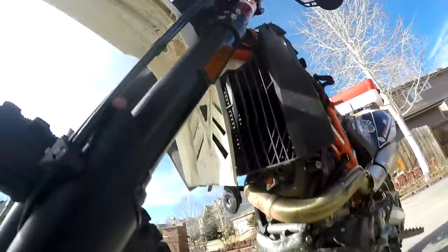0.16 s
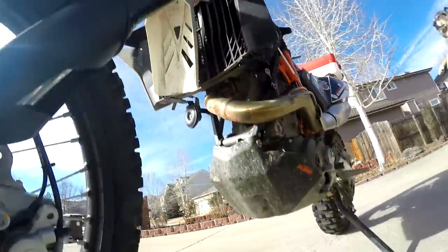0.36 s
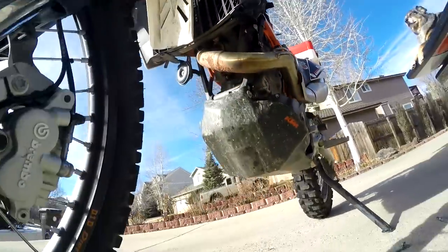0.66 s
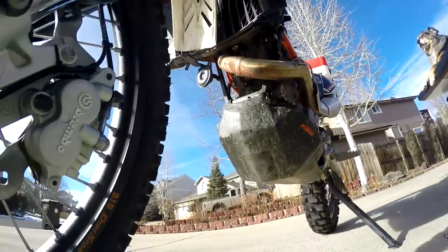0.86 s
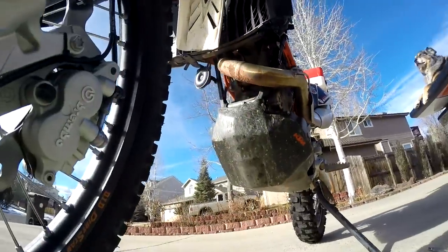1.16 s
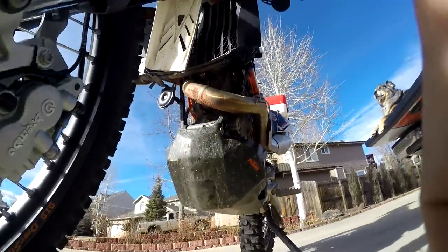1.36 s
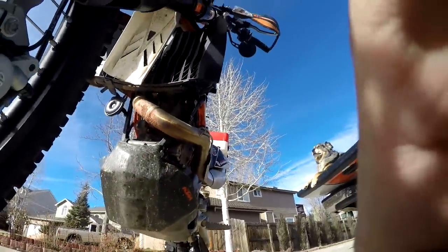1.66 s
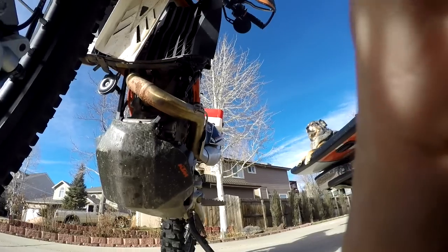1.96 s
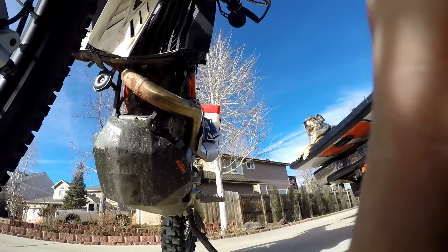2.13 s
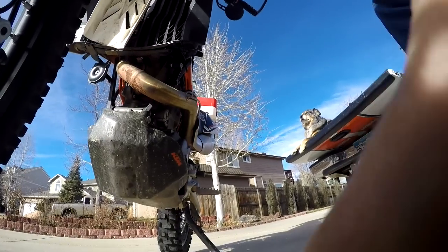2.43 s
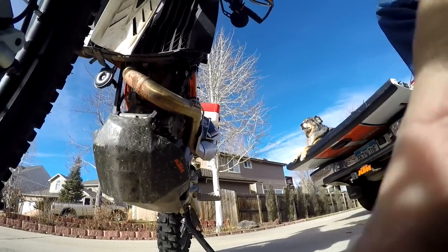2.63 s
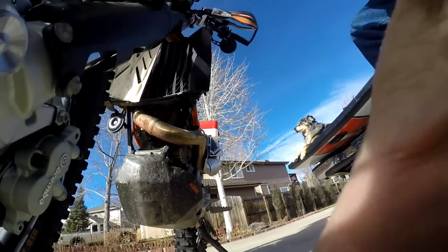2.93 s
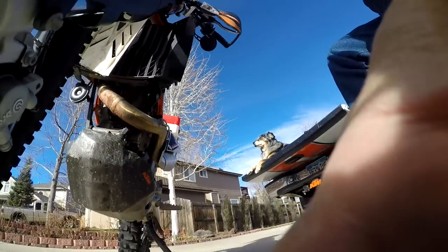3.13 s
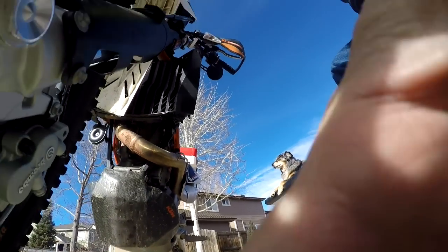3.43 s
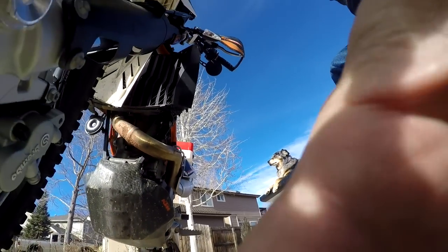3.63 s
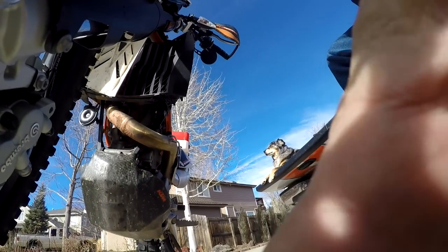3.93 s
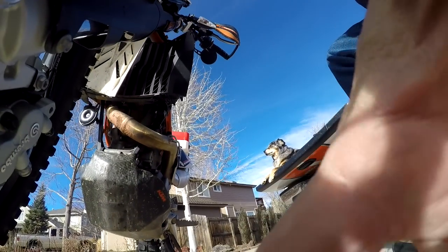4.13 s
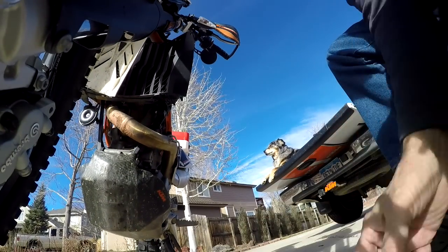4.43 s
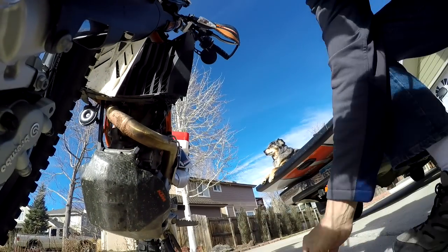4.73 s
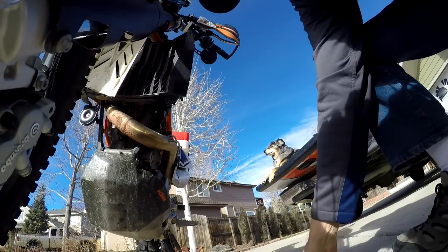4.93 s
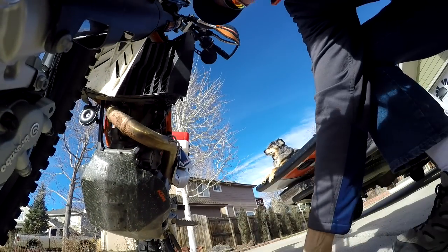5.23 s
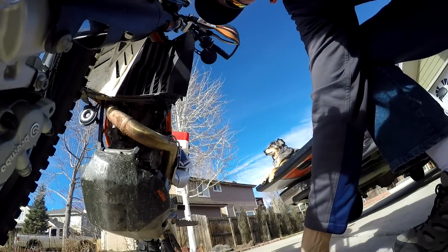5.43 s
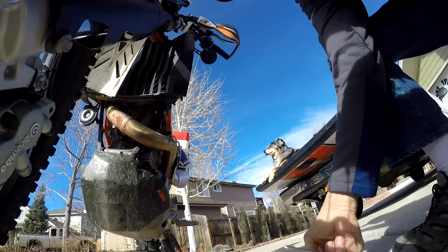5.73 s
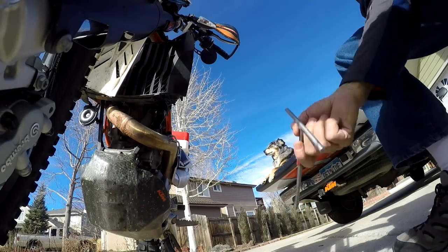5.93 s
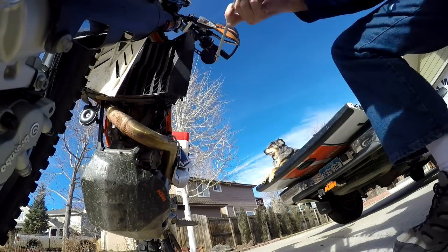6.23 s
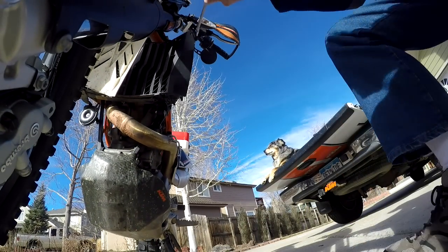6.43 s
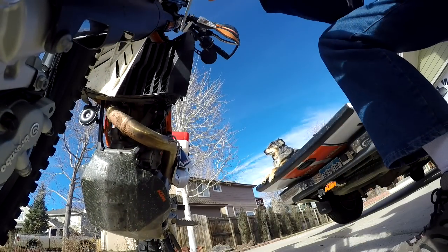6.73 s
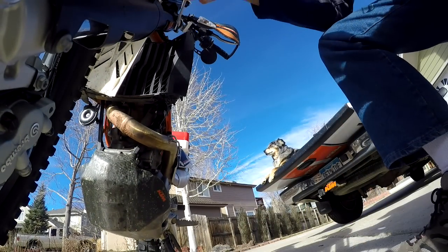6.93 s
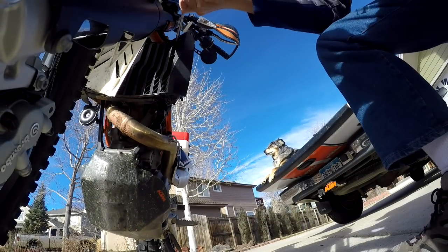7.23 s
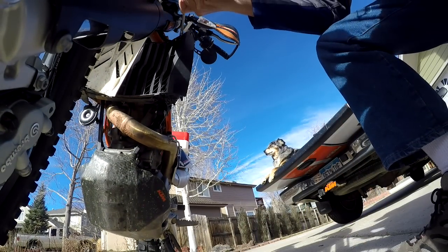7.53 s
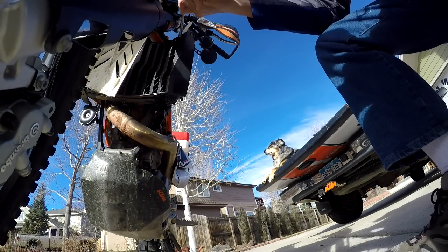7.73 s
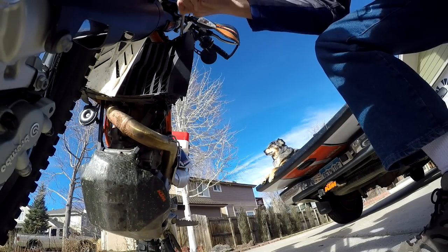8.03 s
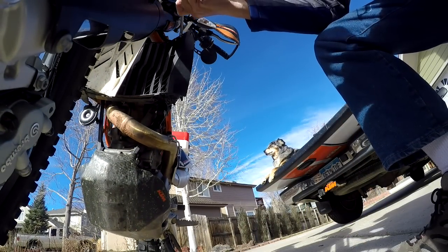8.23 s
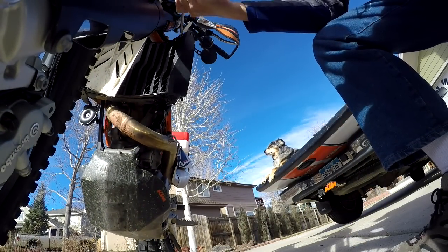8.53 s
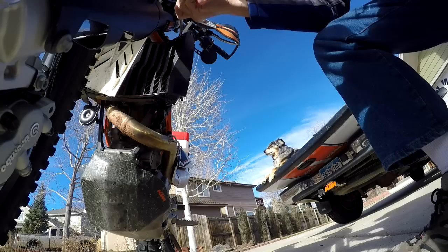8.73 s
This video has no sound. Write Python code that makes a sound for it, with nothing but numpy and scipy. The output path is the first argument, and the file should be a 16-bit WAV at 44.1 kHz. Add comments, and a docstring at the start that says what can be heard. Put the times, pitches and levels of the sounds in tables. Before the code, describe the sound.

Very close, boxy handling noise opens: skin rubbing, sharp plastic cracks, hollow bumps and gritty scrapes in clusters, some hard enough to crunch the microphone. After four seconds the handling stops, leaving faint street rumble and soft wind. A much quieter bright metal jingle skips over concrete, followed by a soft deep thump, one clearer click and scattered tiny tool clicks beside the parked motorbike.

```python
"""On a concrete driveway beside a parked motorbike, a small camera's own microphone hears itself being handled.
Fingers rub its shell, and its case knocks, ticks and scrapes as it is shuffled into place: noise for
friction, and sharp blows with a dying chatter through body resonances for the hits.
Then a steel wrench jingles, as a bank of ringing modes, while it is dragged off the concrete.
It clicks faintly on a bolt, once before the drag and mostly after. Noise makes the wind and outdoor rumble."""
import sys
import numpy as np
from scipy import signal
from scipy.fft import rfft, irfft, next_fast_len
from scipy.io import wavfile
from scipy.ndimage import uniform_filter1d, map_coordinates

SR = 44100
rng = np.random.default_rng(int(sys.argv[2]) if len(sys.argv) > 2 else 0)


def int16_out(signal):
    """Quantize to a 16-bit WAV file."""
    q = np.round(np.clip(np.atleast_2d(signal).T, -1, 1) * 32767)
    wavfile.write(sys.argv[1], SR, q.astype(np.int16))


N = 391166  # length in samples


def amp(db):
    """Decibels to gain."""
    return 10 ** (np.asarray(db) / 20)


def unit(x):
    """Scale to rms 1."""
    return x / np.sqrt(np.mean(x ** 2) + 1e-20)


def crest(x):
    """Scale a hit so that its loudest two milliseconds have rms 1."""
    loudest_power = uniform_filter1d(x ** 2, size=88, mode="constant").max()
    return x / np.sqrt(loudest_power + 1e-20)


def colour(points, hz):
    """Gain at each frequency, from (frequency_hz, level_db) points on a log axis."""
    point_hz, point_db = np.transpose(points)
    return amp(np.interp(np.log(hz + 1), np.log(point_hz), point_db))


def level(rows):
    """Gain per sample along (time_s, level_db) points."""
    return amp(np.interp(np.arange(N) / SR, *np.transpose(rows)))


def wobble(rate):
    """A smooth random curve with rate knots a second."""
    knots = rng.standard_normal(int(N * rate / SR) + 4)
    return map_coordinates(knots, [np.arange(N) * rate / SR])


def filtered(x, response):
    """Multiply the spectrum of x by a complex response of frequency."""
    size = next_fast_len(len(x) + 8192)  # padded so that tails do not wrap round
    spectrum = rfft(x, size) * response(np.fft.rfftfreq(size, 1 / SR))
    return irfft(spectrum, size)[:len(x)]


def noise(points):
    """Coloured noise of rms 1."""
    return unit(filtered(rng.standard_normal(N), lambda hz: colour(points, hz)))


def causal(x, points, size=2048):
    """Colour a hit with a minimum-phase filter, so nothing smears ahead of its onset."""
    cepstrum = irfft(np.log(colour(points, np.fft.rfftfreq(size, 1 / SR))))
    # fold the cepstrum onto positive time
    cepstrum[1:size // 2] *= 2
    cepstrum[size // 2 + 1:] = 0
    impulse = irfft(np.exp(rfft(cepstrum)))
    return signal.fftconvolve(x, impulse)[:len(x)]


def resonate(x, peaks):
    """Pass x through a body's resonances, rows of (pitch_hz, width_hz, level_db)."""
    def response(f):
        total = 0
        for k, (centre, width, db) in enumerate(peaks):
            band = 1j * f * width / (centre * centre - f * f + 1j * f * width)
            total = total + (-1) ** k * amp(db) * band  # neighbours have opposite signs
        return total
    return filtered(x, response)


def ring(modes, scatter_db, size=SR // 2):
    """Free ringing of (pitch_hz, level_db, t60_s) modes, with new strengths and phases for every blow."""
    t = np.arange(size) / SR
    total = np.zeros(size)
    for hz, db, t60 in modes:
        decay = amp(db + scatter_db * rng.normal() - 60 * t / t60)
        total += decay * np.sin(2 * np.pi * (hz * t + rng.random()))
    return total


def contact(t60, grit, size=SR // 8):
    """Contact force: one sharp blow, then a dying chatter of micro-impacts."""
    t = np.arange(size) / SR
    chatter = rng.standard_normal(size) * rng.exponential(size=size) * amp(-60 * t / t60)
    return (t == 0) + grit * chatter / np.linalg.norm(chatter)


RISE_SHARE = 0.41  # part of a stroke spent speeding up


def strokes(rows):
    """Gain of sliding strokes: each speeds up to its peak and slows to rest."""
    t = np.arange(N) / SR
    power = np.zeros(N)
    for peak_s, length_s, db in rows:
        start_s = peak_s - RISE_SHARE * length_s
        end_s = peak_s + (1 - RISE_SHARE) * length_s
        speed = np.sin(np.pi / 2 * np.interp(t, [start_s, peak_s, end_s], [0, 1, 0]))
        power += (amp(db) * speed ** 2) ** 2
    return np.sqrt(power)


def add(track, s, hit):
    """Mix a hit into the track at s seconds."""
    part = track[max(round(s * SR), 0):][:len(hit)]
    part += hit[:len(part)]


# Levels are relative: the functions below trim them into the mix.
# hand pressure rumbling through the case: time_s, level_db
HANDLING = [(0, -44.5), (1.6, -45.5), (2.1, -37), (2.38, -43), (2.47, -31), (3.1, -33.5), (3.4, -70)]
# wind rumbling at the microphone port: time_s, level_db
WIND = [(3.5, -58.5), (4.6, -46), (5.9, -40.5), (6.35, -47.5), (7.5, -58), (7.95, -55.5), (8.1, -39),
        (8.4, -54.5), (8.87, -43)]
# hiss of the outdoor air: time_s, level_db
AIR = [(4.25, -63.5), (5.7, -58), (6.4, -59.5), (7.4, -62.5), (8.5, -62.5), (8.87, -59.5)]
# colours of hand and wind rumble, far street and air hiss: frequency_hz, level_db
BUFFET = [(12, -11.5), (30, 7.5), (48, 2.5), (80, -8.5), (150, -14.5), (300, -27.5), (600, -66.5)]
STREET = [(41, -34), (70, -3), (219, -12), (249, -17.5), (310, -9.5), (461, -14.5), (511, -19.5),
          (887, -32.5), (1160, -37), (1500, -40.5), (1950, -76), (3300, -120)]
HISS = [(600, -22.5), (1000, -2), (1400, -7.5), (2000, -6), (5100, -10), (8500, -16.5), (12800, -17.5),
        (15100, -17), (15600, -44)]


def outdoors():
    """Lumpy low noise is hand and wind at the port; steadier noises are the far street and a thin hiss."""
    lumps = amp(2.5 * wobble(8))
    rumble = amp(5.5) * np.hypot(level(HANDLING), level(WIND)) * lumps * noise(BUFFET)
    street = amp(-49.5 + 0.46 * wobble(0.76)) * noise(STREET)
    hiss = amp(-3.0) * level(AIR) * noise(HISS)
    return rumble + street + hiss


# skin sliding on the shell: peak_s, length_s, level_db
RUBS = [(0.005, 0.032, -30), (0.1, 0.24, -28.5), (0.33, .14, -34.5), (0.45, 0.18, -37.5),
        (0.88, 0.25, -39.5), (1.19, 0.026, -32), (1.265, 0.16, -33), (1.52, 0.13, -39.5),
        (1.985, 0.038, -30), (2.115, 0.16, -28.5), (2.235, 0.096, -30.5), (2.49, 0.11, -32),
        (2.615, 0.25, -19.5), (2.9, 0.31, -35.5), (3.72, 0.15, -34), (3.95, .24, -41.5),
        (4.175, 0.042, -53)]
# the case scraping over the concrete: peak_s, length_s, level_db
SCRAPES = [(0.63, 0.082, -32), (0.76, 0.069, -37.5), (1.38, .11, -23.5), (2.32, 0.032, -38),
           (2.48, 0.19, -26), (2.58, 0.23, -27.5), (3.14, 0.16, -41), (3.495, 0.15, -31.5),
           (3.77, 0.096, -26)]
# the holding hand creeping on the shell between strokes: time_s, level_db
CREEP = [(0, -41.5), (.6, -48.5), (.79, -47.5), (.81, -82), (.85, -48), (1.08, -49), (1.12, -51),
         (1.18, -47.5), (1.45, -42.5), (1.62, -50.5), (1.95, -44.5), (2.85, -45.5), (3.25, -51),
         (3.39, -66.5), (3.63, -71), (3.72, -53.5), (4.0, -47.5), (4.13, -76)]
# resonances of the hollow case under friction: pitch_hz, width_hz, level_db
HOLLOW = [(162, 9.4, 1.2), (410, 52, 0.28)]
# resonances of the plastic shell, also used by ticks and knocks: pitch_hz, width_hz, level_db
SHELL = [(1391, 400, -10.5), (1775, 170, -3.5), (2380, 160, -2), (2945, 340, 10), (3850, 250, 5.5),
         (4970, 170, -3), (5600, 400, -6)]
# colours of sliding skin, rasping concrete and treble fizz: frequency_hz, level_db
SKIN = [(200, -24.5), (700, -9.5), (1500, -6.5), (2200, -2), (2800, -6), (3500, -10.5), (4200, -10),
        (5300, -6), (6200, -16), (7000, -15.5), (9000, -25), (16000, -56)]
RASP = [(300, -10), (900, -4), (1600, -1), (2100, -2), (3000, -33.5)]
FIZZ = [(5000, -31), (7500, -4), (10000, 0.5), (13000, -1), (15200, 0), (15700, -27)]
# colours of a soft push (also knocks and bumps) and a hard snap (also ticks): frequency_hz, level_db
SOFT = [(700, 9.5), (1500, -7), (4000, -29.5), (10000, -56)]
SNAP = [(200, -5), (1000, -5.5), (1500, -2.5), (2600, 4), (4200, -7), (5600, -6.5), (7000, -21),
        (10000, -31), (15000, -39)]
RASP_DB, SCRAPE_RUB_DB = -13, -7.5  # rasp within a rub, rub within a scrape
FIZZ_DB, FIZZ_GROWS = -10.5, 1.31  # the fizz grows faster than the rub


def rubbing():
    """Skin sticks and slips on the plastic, the case rasps on the concrete; friction stirs the hollow case."""
    skin = np.hypot(level(CREEP), strokes(RUBS))
    ground = strokes(SCRAPES)
    rub = np.hypot(skin, amp(SCRAPE_RUB_DB) * ground)
    rasp = np.hypot(ground, amp(RASP_DB) * skin)
    fizz = amp(FIZZ_DB) * rub ** FIZZ_GROWS
    grip = amp(1.2 * wobble(60) + 2.2 * wobble(700))
    hollow = unit(resonate(causal(rng.standard_normal(N), SOFT), HOLLOW))
    # as the finger travels, different resonances of the shell speak up
    slip = noise(SKIN)
    voiced = np.zeros(N)
    for hz, width, db in SHELL:
        voiced += amp(3.5 * wobble(14)) * unit(resonate(slip, [(hz, width, 0)])) * amp(db)
    # dust caught under the skin, about 45 catches a second
    dust = (rng.random(N) < 45 / SR) * rng.standard_normal(N)
    catches = unit(causal(dust, SNAP))
    shell = amp(-3) * noise(SKIN) + amp(-2) * unit(voiced)
    shell += amp(-9.5) * hollow + amp(-10.5) * catches
    return grip * (rub * shell + amp(-5) * rasp * noise(RASP) + fizz * noise(FIZZ))


# grit and fingernails snapping on the shell: start_s, level_db
TICKS = [(0.3294, -10), (0.4521, -2.5), (0.4711, -4), (0.7613, -24), (1.342, -16.5), (1.425, -17.5),
         (1.446, -19.5), (1.6006, -13), (1.6768, -16), (1.7965, -15), (1.8725, -9.5), (2.3088, -19),
         (2.753, -10), (2.9916, -4.5), (3.1749, -15), (3.1864, -17.5), (3.2364, -14.5), (3.2524, -8),
         (3.3052, -24), (3.4787, -12), (3.5405, -13), (3.5646, -7), (3.6695, -16), (3.6925, -18),
         (3.7093, -5), (3.7271, -12.5)]
# the case bumping the ground, also used by knocks: start_s, thud_hz, thud_db, hollow_db, crack_db
KNOCKS = [(0.8201, 275, 9, -0.5, -1), (0.965, 114, -26, -21, -18), (1, 120, -27.5, -27.5, -28),
          (1.087, 180, -23.5, -25.5, -23.5), (1.196, 150, -46, -29, -52), (1.311, 171, -15.5, -12.5, -3),
          (1.359, 220, -27.5, -11, -7.5), (1.375, 297, -24, -12, -17), (1.389, 235, -33, -8.5, -12),
          (1.405, 168, -29.5, -20, -26.5), (1.696, 180, -42.5, -14, -16.5), (1.716, 134, -18, -14.5, -19.5),
          (1.762, 140, -19.5, -14, -20.5), (1.8313, 153, -17.5, -8, -2.5), (1.847, 162, -14, -11, -16),
          (1.903, 288, -28.5, -25, -33.5), (2.102, 110, -36, -21, -36), (2.409, 180, -7.5, -9.5, -18),
          (2.4189, 170, -6.5, -14.5, -3), (2.441, 111, -6.5, -13.5, -12), (2.533, 218, -15.5, -9, -16.5),
          (2.594, 168, -12.5, -11.5, -16), (2.653, 149, -24.5, -7, -20), (2.785, 256, -15, -9.5, -4.5),
          (2.801, 234, -7.5, -15.5, -24), (2.927, 164, -8, -6, -5), (3.086, 250, -11.5, -5.5, -0.5),
          (3.209, 236, -11.5, -4.5, -8.5), (3.2456, 223, -18.5, -18, -14), (3.461, 137, -25, -22.5, -11),
          (3.515, 224, -29, -17.5, -23.5), (3.821, 281, -36, -21.5, -30)]
# ringing modes of the mount, also used by knocks: pitch_hz, level_db, t60_s
MOUNT = [(1922, -2, .19), (2374, 0, .17), (2740, -1, .12), (3230, -2, .15), (3655, -6, .14),
         (5093, -4, .12)]
RATTLE_S, RATTLE_DB = .04, -14  # loose parts tick within this time of a knock, about this far from its crack


def ticks(count=2):
    """Tiny hard contacts snap on the shell and leave the mount faintly ringing; loose parts rattle after knocks."""
    out = np.zeros(N)
    rattle = []
    for s, *_, crack_db in KNOCKS:
        for delay in rng.random(count):
            rattle.append((s + RATTLE_S * delay, crack_db + RATTLE_DB + 3 * rng.normal()))
    for s, db in TICKS + rattle:
        snap = causal(contact(t60=.012, grit=1.5), SNAP)
        shell = resonate(snap, SHELL)
        add(out, s, amp(db - 9) * crest(crest(snap) + amp(-2.5) * crest(shell)))
    for s, db in TICKS:
        add(out, s, amp(db - 39) * crest(ring(MOUNT, scatter_db=2)))
    return out


# the grip shifting the lowest resonance of the case: time_s, pitch_hz
GRIP = [(0.82, 325), (0.96, 419), (1.19, 400), (1.38, 451), (1.7, 397), (2.45, 433.4), (3.3, 385)]
# higher resonances of the hollow case: pitch_hz, width_hz, level_db
CASE = [(580, 127, -5.5), (658, 47, -9), (819.6, 110, -3.5), (1260, 180, -1.5)]
# colours of a crack on the shell and of a sharp edge (also the bolt's sparkle): frequency_hz, level_db
CRACK = [(300, -23), (900, -1.5), (1600, 9.5), (2700, 4), (3300, -3), (3900, -4), (5700, 3.5),
         (7000, -24.5), (10000, -40), (15000, -37.5)]
EDGE = [(4000, -32), (7500, 4), (11000, -10.5), (15200, -10), (16000, -9)]
SETTLE_S, SETTLE_DB = .0045, -7.5  # a second corner lands just after the first, this much softer
EDGE_DB, EDGE_GROWS = -25, 1.5  # the sharp edge grows faster than the crack
ROCK_DB, ROCK_LIMIT_DB = 5.5, -17  # the camera rocks on its mount, as far as the hand lets it


def knocks():
    """Each bump shoves the camera, rings the hollow case and cracks twice on the shell; harder is brighter."""
    out = np.zeros(N)
    for s, thud_hz, thud_db, hollow_db, crack_db in KNOCKS:
        push = causal(contact(t60=.035, grit=.8), SOFT)
        thud = resonate(push, [(thud_hz, .5 * thud_hz, 0)])
        add(out, s, amp(thud_db - 2.0) * crest(thud))
        rock = resonate(push, [(63, 30, 0)])
        add(out, s, amp(min(thud_db + ROCK_DB, ROCK_LIMIT_DB)) * crest(rock))
        hollow_hz = np.interp(s, *np.transpose(GRIP))
        blow = causal(contact(t60=0.024, grit=1.4), SOFT)
        hollow = resonate(blow, [(hollow_hz, 36, 6)] + CASE)
        add(out, s, amp(hollow_db + 2.0) * crest(hollow))
        for at, db in [(s, crack_db), (s + SETTLE_S, crack_db + SETTLE_DB)]:
            scrape = contact(t60=.028, grit=3.7)
            crack = crest(causal(scrape, CRACK)) + amp(-2) * crest(resonate(scrape, SHELL))
            add(out, at, amp(db - 5.5) * crack)
            edge = causal(contact(t60=0.016, grit=2.3), EDGE)
            add(out, at, amp(EDGE_DB + EDGE_GROWS * db) * crest(edge))
        add(out, s, amp(crack_db - 28) * crest(ring(MOUNT, scatter_db=2)))
    return out


# the tool touching the bolt: start_s, level_db, pitch_hz
CLICKS = [(5.0714, -42, 1380), (6.513, -37.5, 1620), (6.5456, -35.5, 1200), (6.5644, -17, 2940),
          (6.9662, -26, 4280), (7.2183, -29, 3080), (7.603, -31.5, 2870), (7.767, -25.5, 5000),
          (7.781, -36, 1460), (8.0679, -34, 3110), (8.082, -30, 1180), (8.1859, -30.5, 4100),
          (8.2491, -35, 1490), (8.6727, -42.5, 1440), (8.7221, -34.5, 2700), (8.7691, -37.5, 1940),
          (8.8112, -26.5, 4700), (8.8343, -34, 2500)]
# damped resonances of the held tool: multiple of the click's pitch, width_hz, level_db
HELD = [(1, 220, -2), (1.43, 220, 0), (2.36, 180, -2)]
# dull bumps of the bike's front end: start_s, level_db
BUMPS = [(5.075, -29.5), (5.13, -32), (5.698, -31), (5.766, -37.5), (7.587, -28), (7.638, -30.5),
         (8.101, -27.5), (8.318, -30.5), (8.383, -28.5), (8.477, -28)]
# resonances of the front end: pitch_hz, width_hz, level_db
FRONT_END = [(303, 37, 16.5), (400, 134, 2.5), (805, 900, -9.5)]
# colours of a touch on the bolt and of a padded blow: frequency_hz, level_db
BOLT = [(400, -12.5), (1200, -3), (2200, -3.5), (3500, -2.5), (5500, -6), (7500, -13.5), (12000, -26)]
PADDED = [(350, 7), (600, -9), (1200, -18), (4000, -45)]
# ringing modes of the wrench, also used by wrench: pitch_hz, level_db, t60_s
WRENCH = [(2837, -11, .05), (3472, -2, .06), (3600, -5, .04), (5163, -8, .07), (5696, 1, .04),
          (5920, -3, .04), (6550, -14, .08), (8166, -10, .06), (8516, -12, .08), (10730, -10, .13),
          (13210, -14, .05), (14020, -16, .12)]
CLICK_T60_S, CLICK_RING_DB = 0.039, -4  # chatter of a touch, its damped ring
SPARKLE_DB, SPARKLE_GROWS = -23.5, 1.25  # harder touches sparkle more
THUMP_S, THUMP_DB, THUMP_HZ = 6.486, -17.5, 134  # one soft, deep thump


def bolt():
    """The held wrench clicks and scrapes on the bolt, barely ringing, and nudges the bike."""
    out = np.zeros(N)
    for s, db, hz in CLICKS:
        touch = contact(t60=CLICK_T60_S, grit=3.2)
        click = causal(touch, BOLT)
        held_modes = [(multiple * hz, width, mode_db) for multiple, width, mode_db in HELD]
        steel = resonate(click, held_modes)
        add(out, s, amp(db - 11) * (crest(click) + amp(CLICK_RING_DB) * crest(steel)))
        add(out, s, amp(SPARKLE_DB + SPARKLE_GROWS * db) * crest(causal(touch, EDGE)))
        add(out, s, amp(db - 33.5) * crest(ring(WRENCH, scatter_db=1)))
    for s, db in BUMPS:
        push = causal(contact(t60=0.043, grit=1.0), SOFT)
        add(out, s, amp(db - 5.5) * crest(resonate(push, FRONT_END)))
    padded = causal(contact(t60=0.0157, grit=0.96), PADDED)
    thump = resonate(padded, [(THUMP_HZ, 0.35 * THUMP_HZ, 0)])
    add(out, THUMP_S, amp(THUMP_DB) * crest(thump))
    return out


# the wrench skipping over the concrete: start_s, level_db, shank_db (long ring of the shank)
CLINKS = [(5.2516, -38, -59.5), (5.3639, -48, -59.5), (5.4345, -42.5, -52), (5.472, -45.5, -72),
          (5.5399, -42.5, -69), (5.5614, -35.5, -59), (5.6026, -38.5, -59), (5.663, -31.5, -72),
          (5.6736, -41, -69), (5.6948, -27.5, -58), (5.7078, -31.5, -62), (5.7288, -26, -70),
          (5.7667, -26.5, -64)]
# the wrench dragging between skips: time_s, level_db
DRAG = [(5.24, -90.5), (5.26, -62), (5.51, -63.5), (5.62, -52), (5.75, -49.5), (5.79, -91.5)]
# long ringing modes of the shank and of the lifted wrench: pitch_hz, level_db, t60_s
SHANK = [(1270, 0, .6), (1766, -13, .4)]
PING = [(4646, 0, .5), (4653, -9, .5), (11290, -27, .5)]
# colour of steel grating on concrete: frequency_hz, level_db
GRATE = [(500, -6), (1800, 1), (3500, 6), (6000, 1.5), (9000, -18), (14000, -11.5)]
CATCHES_PER_S = 82  # small skips while it drags
LIFT_S, PING_DB = 5.72, -49  # clinks after the lift also ping freely


def wrench():
    """The steel grates over the concrete in short skips; its bright modes die at once, a few sing on."""
    # the dragged edge catches on grains of the concrete
    catches = (rng.random(N) < CATCHES_PER_S / SR) * rng.uniform(.5, 1, N)
    grains = unit(rng.standard_normal(N) * amp(4.5 * wobble(180))) + amp(4) * unit(catches)
    jingle = unit(signal.fftconvolve(grains, ring(WRENCH, scatter_db=1))[:N])
    drag = jingle + amp(-6) * unit(causal(grains, GRATE))
    out = amp(-6.5) * level(DRAG) * drag
    for s, db, shank_db in CLINKS:
        grate = contact(t60=.037, grit=2.3)
        # each way of lying on the ground detunes the damped modes a little
        modes = [(hz * (1 + .008 * rng.normal()), mode_db, t60) for hz, mode_db, t60 in WRENCH]
        clink = signal.fftconvolve(ring(modes, scatter_db=3), grate)
        add(out, s, amp(db - 9.5) * crest(clink))
        add(out, s, amp(db - 12) * crest(causal(grate, GRATE)))
        add(out, s, amp(shank_db) * crest(ring(SHANK, scatter_db=1)))
        if s > LIFT_S:
            add(out, s, amp(PING_DB) * crest(ring(PING, scatter_db=1)))
    return out


def scene():
    """Everything at the camera's one microphone."""
    return (outdoors() + rubbing() + ticks() + knocks() + bolt() + wrench())[None]


TOP_HZ = 16000  # band limit


def record(dry):
    """The hardest knocks overload the microphone with a dull crunch; nothing is kept above the band limit."""
    sound = dry[0]
    clipped = sound / (1 + np.abs(sound / .92) ** 6) ** (1 / 6)
    # the distortion alone is dulled, then put back
    crunch = filtered(clipped - sound, lambda hz: 1 / (1 + (hz / 6500) ** 8))
    limited = np.clip(sound + crunch, -.96, .96)
    return filtered(limited, lambda hz: hz < TOP_HZ)[None]


dry = scene()
out = record(dry)
int16_out(out)
```